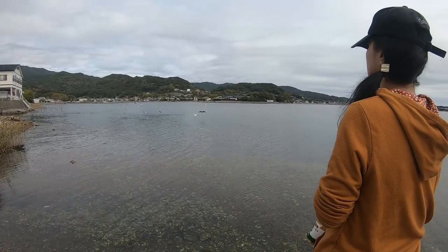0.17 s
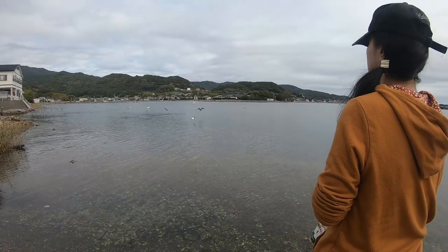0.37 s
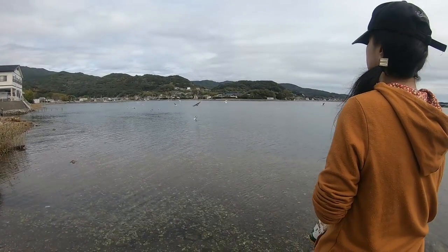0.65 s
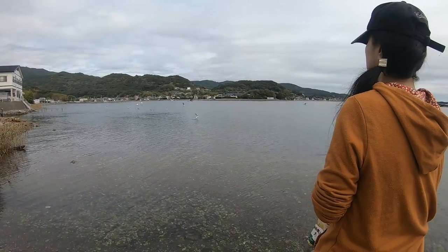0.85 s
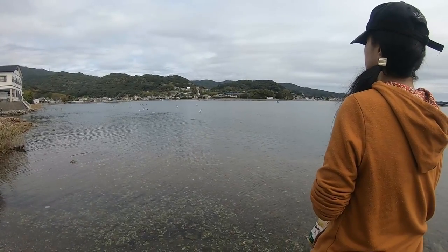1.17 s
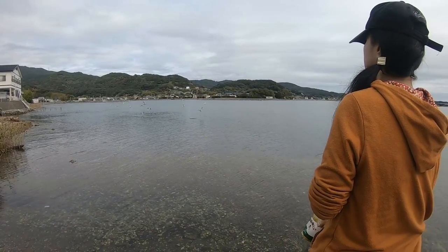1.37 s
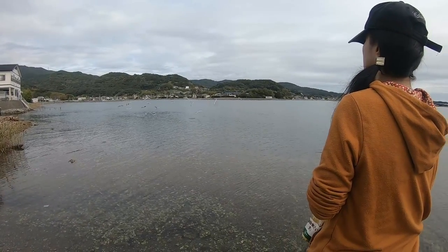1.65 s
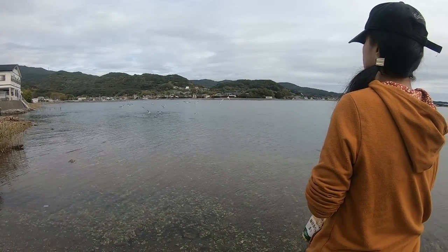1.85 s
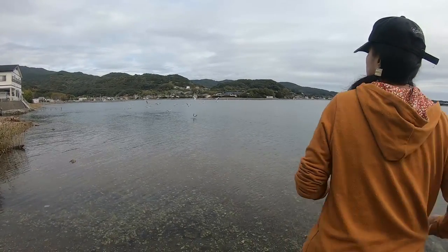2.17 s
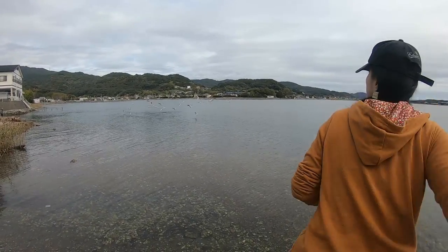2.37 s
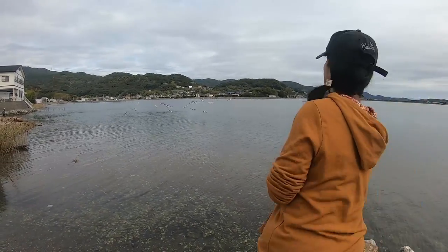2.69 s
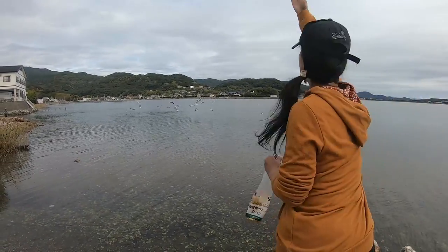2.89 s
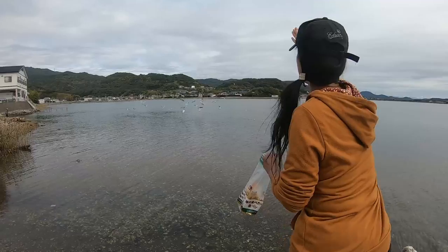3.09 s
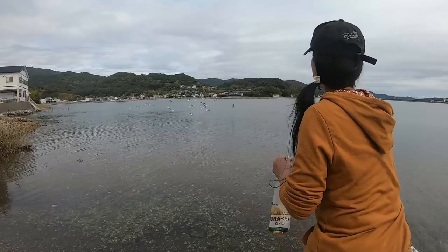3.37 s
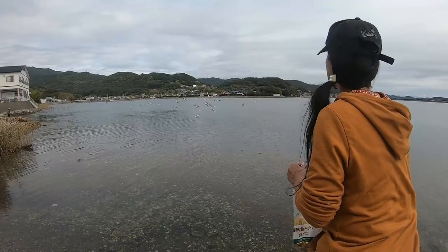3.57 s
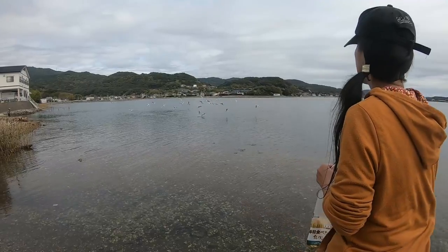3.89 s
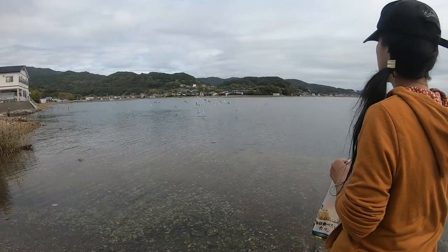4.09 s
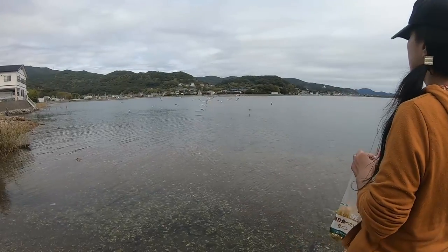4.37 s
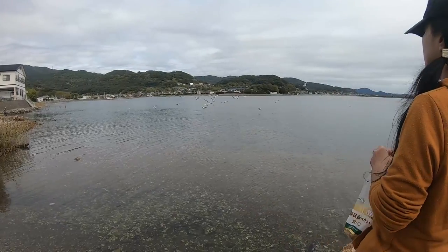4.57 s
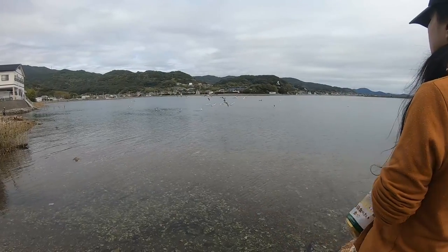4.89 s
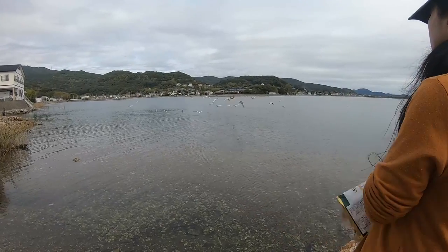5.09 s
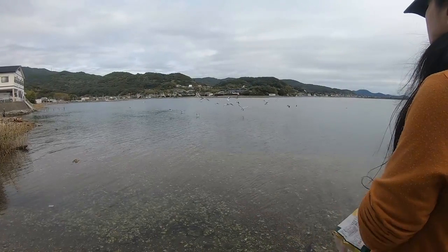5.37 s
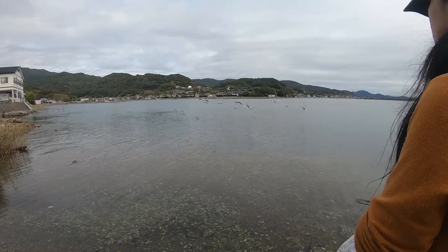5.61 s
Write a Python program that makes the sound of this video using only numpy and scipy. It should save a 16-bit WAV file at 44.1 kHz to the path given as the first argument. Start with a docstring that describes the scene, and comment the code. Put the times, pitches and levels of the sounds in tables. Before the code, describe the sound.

A brief gust rumbles on the microphone and a sleeve scrapes, then gulls call over a calm open bay: short rough cries, one long rattling rasp, a soft far flock. A sweatshirt and plastic bag rustle close by around two seconds, small plops follow near four, and the bag crinkles busily to the end. Faint water and wind lie underneath.

```python
"""A gust of wind rumbles on the microphone and a sleeve scrapes, then gulls call over a calm bay.
The birds are harmonic tones gated in bursts or rattles and shaped by resonances: one long rasp, many
short cries and a far flock, with an echo from the shore. Close by, a sweatshirt and a plastic snack bag
rustle in trains of tiny filtered clicks as someone throws food to the birds. Decaying sines make plops,
a sleeve knock and high chips of the gulls; filtered noise makes small waves, sleeve buffeting and wind."""
import sys
import numpy as np
from scipy import signal
from scipy.fft import rfft, irfft
from scipy.io import wavfile
from scipy.ndimage import uniform_filter1d

SR = 44100
rng = np.random.default_rng(int(sys.argv[2]) if len(sys.argv) > 2 else 0)


def store_pcm(level_fs):
    """Save levels as 16-bit WAV."""
    pcm = np.round(np.clip(level_fs, -1, 1) * 32767).astype(np.int16)
    wavfile.write(sys.argv[1], SR, np.atleast_2d(pcm).T)


N = 253134
TIME = np.arange(N) / SR

# spectrum of rubbed and creased plastic: (frequency [Hz], relative level [dB])
RUB_SPECTRUM = [(880, -32), (1500, -2.5), (2030, -7), (2330, -2), (3030, 0.5), (3830, -8), (5610, -8),
                (8710, -21), (10200, -20), (13000, -22.5), (15500, -30)]


def amp(db):
    """Level law: decibels become an amplitude ratio."""
    return 10 ** (np.asarray(db) / 20)


def unit(x):
    """Normalization to a root-mean-square of 1."""
    return x / np.sqrt(np.mean(x ** 2) + 1e-20)


def read(points, hz):
    """Interpolation along a logarithmic frequency axis."""
    f, value = np.transpose(points)
    return np.interp(np.log(hz + 1), np.log(f + 1), value)


def colour(x, points, size=1, tilt_db=0):
    """Linear filtering: a spectrum, scaled in frequency by size and tilted in dB per octave above the bass."""
    bass_hz = 500
    hz = np.fft.rfftfreq(x.shape[-1], 1 / SR)
    octaves = np.log2(np.maximum(hz / bass_hz, 1))
    gain = amp(read(points, hz / size) + tilt_db * octaves)
    return irfft(rfft(x) * gain, x.shape[-1])


def drift(count, hz):
    """Random modulation: noise low-passed at a given rate, of rms 1."""
    f = np.fft.rfftfreq(count, 1 / SR)
    return unit(irfft(rfft(rng.standard_normal(count)) / (1 + (f / hz) ** 4), count))


def add(mix, s, sound):
    """Superposition: adds a sound into the mix from a time in seconds."""
    part = mix[max(round(s * SR), 0):][:len(sound)]
    part += sound[:len(part)]


def pan(db):
    """Interaural level difference: left and right gains, left louder by db."""
    return amp(np.array([[db], [-db]]) / 2)


def around(pair):
    """Diffuse-field coherence: mixes two unrelated signals until they are as alike as the table says."""
    # coherence of a wide source at two microphones: (frequency [Hz], left-right likeness [-1 to 1])
    coherence = [(30, 0.9), (250, 0.99), (600, 0.71), (1200, 0.086), (2300, 0.31), (4500, 0.091),
                 (10000, 0.033)]
    a, b = rfft(pair)
    same = np.clip(read(coherence, np.fft.rfftfreq(N, 1 / SR)), -1, 1)
    return irfft(np.array([a, same * a + np.sqrt(1 - same ** 2) * b]), N)


def noise(points):
    """Broadband excitation: wide Gaussian noise given a spectrum."""
    return unit(colour(around(rng.standard_normal((2, N))), points))


def grains(per_s, spread_db):
    """Poisson-like impulses: random clicks of uneven size and either sign, independent on the two sides."""
    sizes = amp(spread_db * np.minimum(rng.exponential(1, (2, N)), 4))
    signs = rng.choice([-1, 1], (2, N))
    return unit(sizes * signs * (rng.random((2, N)) < per_s / SR))


def strokes(rows, rise=0.43):
    """Energy addition: gain of (peak [s], length [s], level [dB]) ramps up and down, summed in power."""
    rise = np.clip(rise, .1, .9)
    power = 0
    for s, length, db in rows:
        ramp = np.interp(TIME - s, [-rise * length, 0, (1 - rise) * length], [0, amp(db), 0])
        power = power + ramp ** 2
    return np.sqrt(power)


def rasp(jitter=0.01, waver=0.0085, beak_width_hz=330, beak_db=6, dulling=0.51):
    """Pulsed phonation: the syrinx snaps open in bursts; in each the pitch swoops up and the voice brightens."""
    # course of the call: (time [s], pitch [Hz], beak resonance [Hz], burst rate [1/s])
    course = [(1.32, 1246, 2750, 124), (1.365, 1420, 5600, 144), (1.425, 1356, 3250, 134),
              (1.462, 1270, 4530, 127), (1.599, 1273, 4960, 122), (1.645, 1200, 2460, 111),
              (1.69, 1125, 2130, 107), (1.785, 997, 1483, 99)]
    # throat response: (frequency [Hz], gain [dB])
    throat_response = [(600, -9), (1120, -3.5), (1700, -8), (2150, 6), (2400, 4), (2760, 6.5), (3250, -3),
                       (3620, -1), (4250, -5), (4900, 1), (5900, -11), (6350, -2), (8100, -27), (8800, -13),
                       (9500, -10.5), (10200, -24), (15000, -28)]
    # a tense voice is brighter and swoops further; half lines are strongest when slack, weakest midway:
    # (pitch [Hz], brightness [dB/octave], swoop [share of pitch], half lines [share])
    tension = [(1107, -2.5, 0.1, 1), (1269, 3.5, 0.336, 0.52), (1435, 8, 0.42, 0.78)]
    level_db, start_db, sag_db, end_db = -40.5, -7.5, 3.5, -13.5
    attack_s, release_s = 0.029, 0.074
    lasts, rise, fall = .86, .16, .4  # share of the period open; shares of that spent rising, falling
    crest = .6  # share of the burst period at which its pitch is highest
    scatter = .05  # random pitch deviation, share of the swoop
    flare_db = 42  # brightening through a burst, dB per octave for a full swoop
    noise_share = .16  # of the tone

    s, *controls = np.transpose(course)
    t = np.arange(0, s[-1] - s[0], 1 / SR)
    hz, beak_hz, rate = (np.interp(s[0] + t, s, c) for c in controls)
    # a quick swell, a slight sag in the middle, then a decay
    fade_db = np.interp(t, [0, attack_s, t[-1] - release_s, t[-1]], [start_db, 0, 0, end_db])
    db = level_db + fade_db - sag_db * np.sin(np.pi * t / t[-1]) ** 2

    tense_hz, *voice = np.transpose(tension)
    bright_db, arch, half = (np.interp(hz, tense_hz, c) for c in voice)
    bright_db = bright_db + dulling * fade_db  # a softer voice is duller
    age = np.cumsum(rate * (1 + jitter * drift(len(t), 60))) / SR % 1  # phase within the burst
    flare = flare_db * arch * np.minimum(age - crest, 0)  # low partials lead each burst
    pitch = hz * (1 - arch * (age / crest - 1) ** 2 + arch * scatter * drift(len(t), 105))
    turns = np.cumsum(pitch) / SR
    # every burst starts its tone afresh
    turns -= np.maximum.accumulate(turns * (np.diff(age, prepend=1) < 0))
    turns += np.cumsum(hz * waver * drift(len(t), 350)) / SR

    tone = np.zeros(len(t))
    for k in np.arange(2, 25) / 2:  # strong and weak cycles alternate, which gives half lines
        beak = beak_db * np.exp(-((k * pitch - beak_hz) / beak_width_hz) ** 2)
        unsteady = 2 * drift(len(t), 45)  # no two bursts are quite alike
        partial_db = bright_db * np.log2(k / 2) + flare * np.log2(max(k, 2) / 4.0) + beak + unsteady
        gain = (half if k % 1 else 1) * amp(partial_db)
        tone += gain * np.cos(2 * np.pi * (k * turns + rng.random()))

    gate = np.interp(age / lasts, [0, rise, 1 - fall, 1], [0, 1, 1, 0])
    source = gate * (unit(tone) + noise_share * rng.standard_normal(len(t)))
    sound = mirrored(colour(source, throat_response))
    sound /= np.sqrt(uniform_filter1d(sound ** 2, size=1600))  # even level, so that db alone sets it
    return s[0], sound * amp(db) * signal.windows.tukey(len(t), .01)


def mirrored(x):
    """Comb interference: the echo off the water carves notches that rise slowly as the bird flies on."""
    late_s, gained_s, share = .00107, .00018, .66  # first delay, its shortening by the end, echo gain
    n = np.arange(len(x))
    delay_s = late_s - gained_s * (n / len(x)) ** 2
    return x + share * np.interp(n - SR * delay_s, n, x)


def cry(middle, length, db, hz, rough, low_hz, mid_hz, high_hz, low_db, high_db,
        swoop=0.037, uneven=0.328, closing=0.041):
    """Source-filter voice: an arched, rattling tone through resonances that sink as the beak closes."""
    rattle_hz, harsh_hz, depth = 57, 170.6, 0.5  # rate when clear, added at full roughness; depth 0-1
    arch_clear, arch_harsh = .33, 0.05  # pitch arch; the pitch falls by 4/3 of this share at either end
    jitter, noise_share = .12, 0.7  # pitch unsteadiness and breath noise at full roughness
    t = np.arange(-length / 2, length / 2, 1 / SR)
    u = 2 * t / length  # -1 at the start, 1 at the end
    rattles = (rattle_hz + harsh_hz * rough ** 4) * (t + np.cumsum(uneven * drift(len(t), 130)) / SR)
    shake = np.clip(depth, 0, 1) * np.cos(2 * np.pi * rattles)
    arch = arch_clear + (arch_harsh - arch_clear) * rough
    arc = 1 + arch * (np.cos(np.pi * u) - 1) * 2 / 3
    unsteady = jitter * rough ** 1.35 * drift(len(t), 640)
    turns = np.cumsum(hz * (arc + swoop * shake + unsteady)) / SR  # a rattle lifts pitch and level
    tone = unit(sum(np.cos(2 * np.pi * (k * turns + rng.random() / 2)) for k in range(1, 12)))
    drive = (tone + noise_share * rough ** 2 * rng.standard_normal(len(t))) * (1 + shake)
    centres, levels = np.array([low_hz, mid_hz, high_hz]), (low_db, 0, high_db)
    opened = throat(drive, centres * (1 + closing), levels)
    closed = throat(drive, centres * (1 - closing), levels)
    sound = unit(opened * (1 - u) + closed * (1 + u))
    return middle - length / 2, amp(db) * sound * np.cos(np.pi * u / 2) ** 2


def throat(x, centres_hz, levels_db):
    """Formant filtering: three steep-sided resonances over a shallow valley."""
    # range of a short cry, whatever the throat: (frequency [Hz], gain [dB])
    cry_range = [(500, -30), (1100, -1), (1700, -1), (2600, 0.5), (3500, 0.5), (4200, -1), (5000, -2),
                 (5600, -2.5), (8000, -22), (9200, -8), (13000, -25)]
    half_widths_hz = (250, 270, 390)
    valley_db = -21  # what passes between the resonances
    hz = np.fft.rfftfreq(len(x), 1 / SR)
    power = amp(2 * valley_db)
    for centre, db, width in zip(centres_hz, levels_db, half_widths_hz):
        power = power + amp(2 * db) / (1 + ((hz - centre) / width) ** 4)
    return unit(colour(irfft(rfft(x) * np.sqrt(power), len(x)), cry_range))


def near_gulls():
    """Superposition of the nearest voices: the rasp and the short cries."""
    # short cries: (middle [s], length [s], level before its fades [dB], top of the pitch arch [Hz],
    # roughness [0-1], low, middle and high resonance [Hz], low and high against the middle one [dB])
    short_cries = [ (.138, 0.12, -52, 618, .9, 1520, 3030, 3860, 4, -2),
                   (.492, 0.094, -46, 517, .8, 2450, 2850, 4500, 0, -1.5),
                   (0.754, 0.093, -51, 624, .8, 1700, 3260, 4200, -9, -4),
                   (0.867, 0.068, -53, 728, .55, 1300, 2670, 3900, -2, -1),
                   (1.039, 0.092, -54, 777, .88, 1500, 3030, 4400, 2, -5),
                   (1.176, 0.082, -44.5, 516, .85, 2310, 2700, 4470, -2, -0.5),
                   (1.626, .048, -42, 600, .85, 2392, 3000, 4000, -2, -5),
                   (1.712, .085, -41.5, 539.5, .8, 2500, 3100, 4150, -7, -1),
                   (1.826, 0.03, -55, 802, .6, 2275, 3200, 4000, -2, 0),
                   (2.339, 0.085, -48, 1068, .35, 2050, 2930, 5000, -1, -8),
                   (2.508, 0.051, -56, 613, .3, 1240, 2400, 4300, 11, -4),
                   (2.71, .065, -65, 1256, .2, 1300, 2520, 3800, 8, -6),
                   (2.917, 0.071, -46.5, 776, .48, 1450, 3340, 3680, -0.5, -7),
                   (2.99, .11, -46, 842, .4, 1450, 3370, 3950, -2.5, -8),
                   (3.023, 0.024, -51.5, 1285, .13, 1310, 2600, 3900, 9, -8),
                   (3.073, 0.09, -52.5, 681, .6, 1580, 2780, 3860, 4.5, -2),
                   (3.245, 0.059, -52.5, 1297, .45, 1300, 2600, 4270, 13, -4.5),
                   (3.288, 0.062, -53, 792, .5, 1400, 2530, 3230, -1, -2),
                   (3.572, 0.05, -56, 870, .66, 1750, 3340, 5030, -7, -11),
                   (3.702, .08, -40, 841, .47, 1470, 2880, 3520, -1, -6),
                   (3.929, .074, -47.5, 878, .55, 1470, 2650, 4450, -0.5, -5),
                   (4.309, 0.08, -45, 758, .52, 1330, 2540, 3640, 2.5, 1),
                   (4.366, 0.03, -56.5, 601, .6, 1600, 2900, 4600, 5, -7),
                   (4.525, 0.032, -55.5, 1550, .2, 1550, 3000, 4600, 15, 0),
                   (5.328, .076, -47.5, 619, .7, 1400, 3030, 4600, -15, -9)]
    out = np.zeros(N)
    add(out, *rasp())
    for row in short_cries:
        add(out, *cry(*row))
    return out


def far_flock(count=80, level_db=-66, spread_db=7, variety=0.29):
    """Size scaling of resonances: many soft distant cries from birds of different sizes."""
    rough = .42  # 0-1
    throat_hz, low_db, high_db = np.array([1330, 2700, 3960]), 8.5, -0.5  # levels against the middle one
    out = np.zeros((2, N))
    for k, (when, length, loud, pitch, size) in enumerate(rng.random((count, 5))):
        middle = (k + when) / count * N / SR
        db, hz = level_db + spread_db * loud, 1150 + 450 * pitch
        centres = throat_hz * (1 + variety * (2 * size - 1))
        add(out[k % 2], *cry(middle, .05 + .09 * length, db, hz, rough, *centres, low_db, high_db))
    return around(out)


def shore(x, early_db=-12, early_s=0.0069, tail_db=-16):
    """Reverberation: water and stones scatter the calls at once; the shore returns a faint decaying tail."""
    # decay of the tail: (frequency [Hz], time to fall 60 dB [s])
    decay = [(300, 0.41), (2500, 0.35), (6000, 0.59), (12000, 0.046)]
    t = np.arange(SR // 2) / SR
    early, taps = rng.standard_normal((2, 2, len(t)))
    early *= np.exp(-t / early_s)
    hz, age, z = signal.stft(taps, SR, nperseg=256)
    fading = z * amp(-60 * age / read(decay, hz)[:, None])
    tail = signal.istft(fading, SR, nperseg=256)[1][:, :len(t)]
    echo = amp(early_db) * early / np.linalg.norm(early[0]) + amp(tail_db) * tail / np.linalg.norm(tail[0])
    return x + signal.fftconvolve(x, echo, axes=1)[:, :N]


def rustle(rub_db=10, drag_db=2):
    """Stick-slip friction: clumps of tiny clicks with stray crackles; a pressed sleeve adds a duller scrape."""
    # arm movements: (fastest [s], length [s], relative bag rustle [dB], relative sleeve scrape [dB])
    moves = [(0.023, 0.067, -67, -55.5), (0.294, 1, -74.5, -68), (0.77, 0.057, -90, -51.5),
             (0.874, 0.046, -72, -53.5), (2.07, 0.15, -60.5, -53), (2.13, 0.12, -61, -49.5),
             (2.27, 0.081, -63, -54.5), (2.31, 0.12, -67.5, -65), (2.952, 0.51, -67.5, -61.5),
             (4.777, 0.039, -65, -49.5), (4.883, 0.36, -69.5, -54), (5.021, 0.26, -62.5, -52),
             (5.2, 0.46, -64, -52), (5.244, 0.038, -58, -51), (5.337, 0.21, -59.5, -50.5),
             (5.441, 0.12, -54.5, -43), (5.479, 0.029, -66, -44), (5.608, 0.4, -67, -54.5),
             (5.69, 0.064, -62.5, -46.5), (5.73, 0.11, -68, -56.5)]
    # spectrum of the sleeve: (frequency [Hz], relative level [dB])
    drag_spectrum = [(200, -14.5), (330, 1), (520, -5), (800, 3), (1300, 0), (1900, -10), (3000, -24),
                     (4500, -30)]
    clump_db = 3.3  # depth of the sticking and slipping
    crackle_db, crackle_tilt_db = .5, 1.5  # level against the rustle, brightness per octave
    speed_up = 0.65  # share of a movement spent speeding up
    clumps = amp(clump_db * np.minimum(drift(N, 54), 2))
    fizz = unit(colour(around(clumps * grains(per_s=5000, spread_db=2.5)), RUB_SPECTRUM))
    stray = around(grains(per_s=300, spread_db=3.6))
    fizz += amp(crackle_db) * unit(colour(stray, RUB_SPECTRUM, 0.99, crackle_tilt_db))
    scrape = unit(colour(around(grains(per_s=3500, spread_db=4)), drag_spectrum))
    s, length, bag, sleeve = np.transpose(moves)
    fizz *= strokes(zip(s, length, bag + rub_db), speed_up)
    scrape *= strokes(zip(s, length, sleeve + drag_db), speed_up)
    return fizz * pan(db=-3.0) + scrape * pan(db=-7.5)


def snaps():
    """Buckling: creases of the bag flip over in short decaying noise; the small ones tick brighter."""
    # sharp crinkles: (time [s], relative peak [dB])
    crinkles = [(0.179, -39), (0.853, -36), (1.9091, -40), (2.0446, -34), (2.0686, -29), (2.2656, -36),
                (3.3623, -41), (3.378, -38), (3.483, -38), (4.4644, -42), (4.9516, -27.5), (4.9822, -38),
                (5.049, -31), (5.1927, -33), (5.2107, -32), (5.237, -27), (5.247, -32), (5.305, -33),
                (5.3169, -30), (5.3614, -22.5), (5.4001, -25.5), (5.4438, -29), (5.476, -32), (5.5274, -34),
                (5.611, -36), (5.684, -30), (5.7255, -34)]
    decay_s, level_db = .0008, -2.5
    tilt_db, big_db = -1.5, -24  # brightness per octave of a crinkle of relative peak big_db
    brighter = .3  # dB per octave gained for every dB below big_db
    out, t = np.zeros(N), np.arange(512) / SR
    lead = len(t) // 10
    for s, db in crinkles:
        flip = np.roll(rng.standard_normal(len(t)) * np.exp(-t / decay_s), shift=lead)
        crack = colour(flip, RUB_SPECTRUM, 1.0, tilt_db + brighter * (big_db - db))
        add(out, s - lead / SR, amp(db + level_db) * crack / abs(crack).max())
    return out * pan(db=-6.0)


def from_right(pair, count=2):
    """Interaural time difference: sound from the right reaches the left microphone a few samples late."""
    return np.array([np.roll(pair[0], count), pair[1]])


def brief_rings(rise_s=0.00018):
    """Damped oscillation: water plops, a low knock of the sleeve and high gull chips as gliding sines."""
    # The row at 2.124 s is the low knock of the scraping sleeve; those at 2.385, 4.022 and 4.422 s are
    # short high chips of the gulls; the others are pockets of air ringing in the water:
    # (time [s], level at the start of the decay [dB], starting frequency [Hz],
    # time to fall 60 dB [s], glide [octaves/s])
    ring_rows = [(2.124, -36.5, 405, 0.053, -5), (2.385, -38, 3000, 0.014, -8),
                 (3.883, -31.5, 313, 0.096, -0.5), (3.902, -37, 322, 0.089, -2.5),
                 (3.934, -27, 2850, 0.0066, -8), (4.022, -47.5, 4050, 0.033, 6), (4.03, -44, 638, 0.043, 5),
                 (4.36, -38, 194, 0.069, -13), (4.422, -48, 2780, 0.047, -17)]
    out, t = np.zeros(N), np.arange(SR // 6) / SR
    for s, db, hz, t60, glide in ring_rows:
        ring = np.sin(2 * np.pi * np.cumsum(hz * 2 ** (glide * t)) / SR)
        add(out, s, ring * amp(db - 60 * t / t60) * (1 - np.exp(-t / rise_s)))
    return out


def wash_and_low_swells(wash_db=-53.5, low_db=-2.5, swell_db=1, ripple_db=2):
    """Amplitude-modulated noise: the bay's wash, and low lapping joined late by buffeting of the sleeve."""
    # spectra of the wash and of the low swells: (frequency [Hz], relative level [dB])
    wash_spectrum = [(59, -5), (100, -26), (146, -7), (184, 2), (248, -2), (552, -15.5), (742, -7.5),
                     (936, -7.5), (1260, -4.5), (1840, -9), (3540, -14.5), (4280, -22.5), (4860, -20.5),
                     (9950, -39), (15500, -65)]
    low_spectrum = [(70, -11), (130, -4.5), (200, -1), (300, -4), (420, -9.5), (700, -18.5), (1500, -38)]
    # low lapping, joined late by the low buffeting of the moving sleeve: (time [s], relative level [dB])
    low_course = [(0, -53.5), (1.7, -56), (2.1, -54), (4.2, -56), (5.4, -50.5)]
    s, levels = np.transpose(low_course)
    wash = noise(wash_spectrum) * amp(wash_db + swell_db * drift(N, 40.0))
    low_level_db = np.interp(TIME, s, levels) + low_db + ripple_db * drift(N, 10)
    return wash + noise(low_spectrum) * amp(low_level_db)


def wind(gusty_db=3):
    """Turbulent pressure: low noise rumbles on the microphone in a slowly dying breeze and light gusts."""
    # spectrum of the rumble: (frequency [Hz], relative level [dB])
    rumble_spectrum = [(15, -8), (29, 0), (39, 9), (55, 1), (75, -2.5), (120, -11), (300, -59)]
    # gusts: (strongest [s], length [s], level [dB])
    gusts = [(.01, 0.087, -39.5), (.32, 0.25, -47), (2.4, 0.67, -61.5), (3.02, 0.43, -53),
             (4.5, 0.73, -57.5), (5.1, 0.17, -53), (5.63, 0.17, -50)]
    breeze_db, drop_db_per_s = -57.5, 1
    breeze = amp(breeze_db - drop_db_per_s * TIME + gusty_db * drift(N, 4.3))
    return noise(rumble_spectrum) * np.hypot(breeze, strokes(gusts)) * pan(db=-3.5)


def scene():
    """Superposition of birds over the bay, water, wind and the feeder close by."""
    gulls = shore(near_gulls() * pan(db=0.5) + far_flock() * pan(db=16.5))
    feeder = from_right(rustle() + snaps())
    return gulls + wash_and_low_swells() * pan(db=1.5) + brief_rings() + wind() + feeder


def record(dry):
    """Transducer response and band limiting: microphone colour, then the recorder's low-pass."""
    # treble response of the microphone: (frequency [Hz], gain [dB])
    treble = [(10500, 1.5), (13000, -9), (15500, -17)]
    edge_hz = 15600
    low_pass = signal.firwin(511, edge_hz, window=("kaiser", 9), fs=SR)
    return signal.oaconvolve(colour(dry, treble), low_pass[None], "same")


dry = scene()
out = record(dry)
store_pcm(out)
```